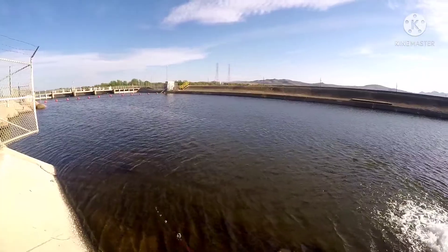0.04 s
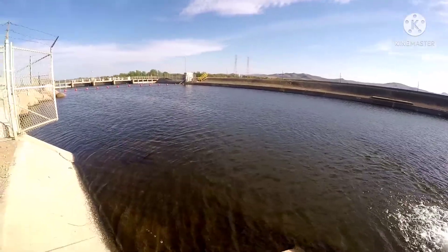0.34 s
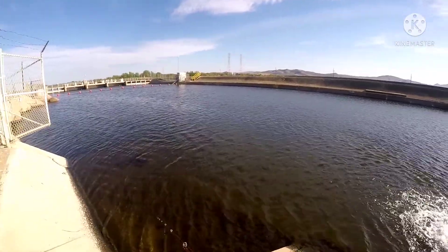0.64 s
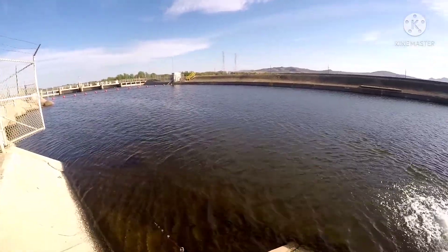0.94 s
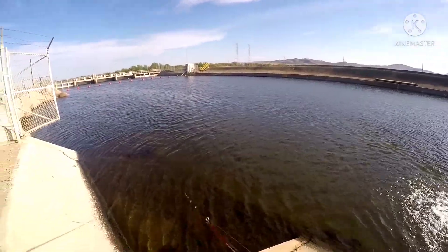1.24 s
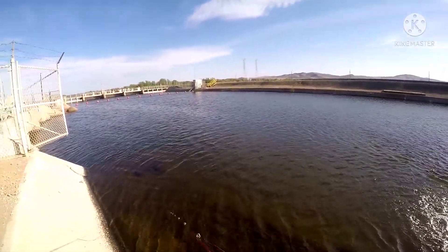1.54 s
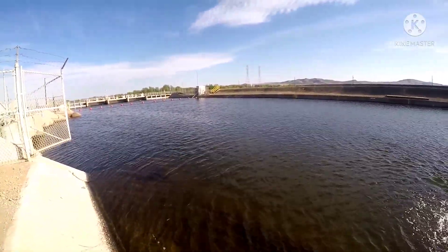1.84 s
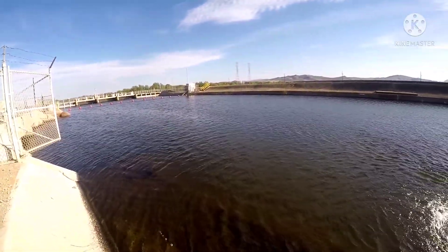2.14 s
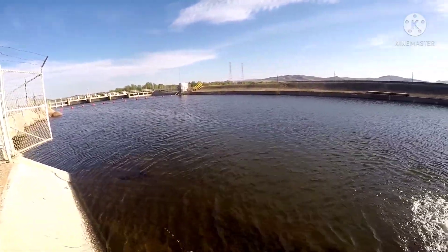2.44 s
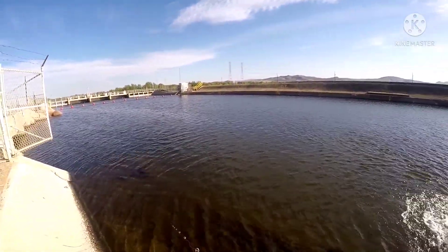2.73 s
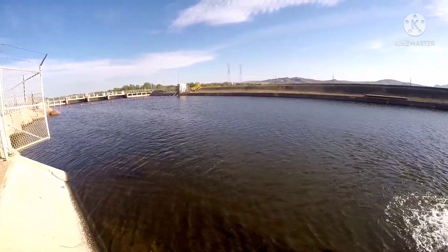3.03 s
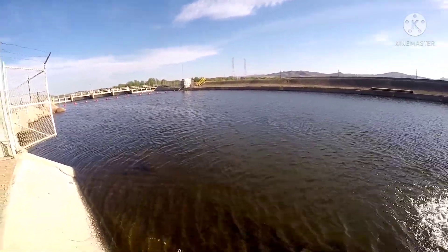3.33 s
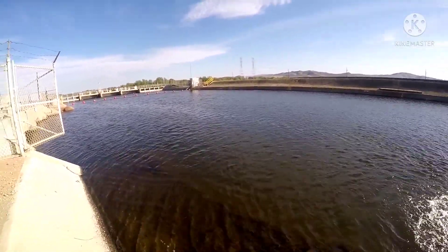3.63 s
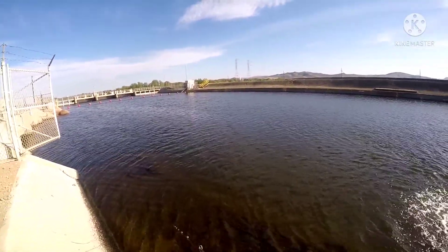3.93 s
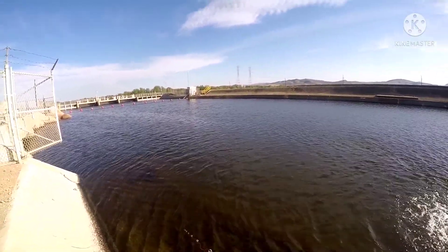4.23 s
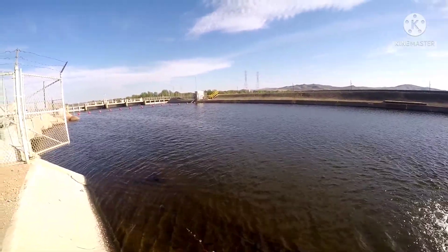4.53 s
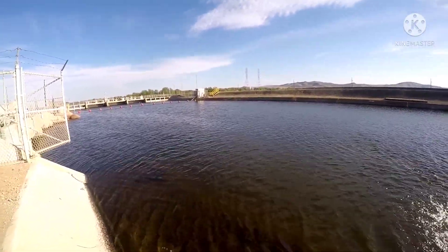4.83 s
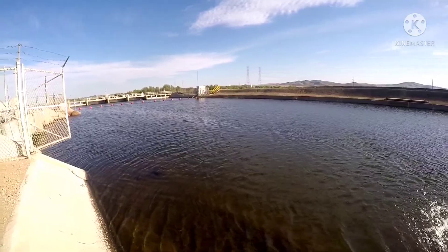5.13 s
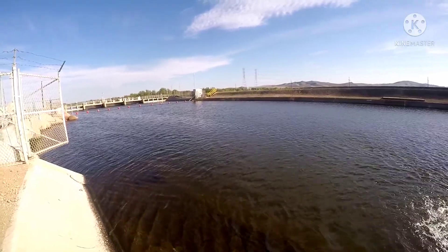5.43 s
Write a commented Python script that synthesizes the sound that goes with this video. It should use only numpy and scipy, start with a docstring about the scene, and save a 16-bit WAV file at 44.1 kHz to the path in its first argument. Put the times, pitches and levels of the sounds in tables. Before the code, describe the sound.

A jet of water splashes and gurgles steadily into a canal, while gusts of wind buffet the microphone.

```python
"""Canal side, a small camera a few metres from an outflow pipe. From the start the jet plunges in: big
bubbles gurgle where it drives air under, lumps of water slap, drops and spray patter back on top.
Gusts buffet the microphone through the first second and a half. Near 2 s the jet falters; the wind
eases, then picks up again at 3 s. The splash thins once more at 4.5 s and runs on to the end."""
import sys
import numpy as np
from scipy import signal
from scipy.fft import rfft, irfft
from scipy.io import wavfile
from scipy.ndimage import uniform_filter1d

SR = 44100
rng = np.random.default_rng(int(sys.argv[2]) if len(sys.argv) > 2 else 0)


def dump_mix(stems):
    """Bounce the given channels to the path in sys.argv[1] as a 16-bit WAV at rate SR."""
    frames = np.atleast_2d(stems).T  # one column per channel
    limited = np.clip(frames, -1, 1)  # hard clip at full scale
    pcm = np.round(limited * 32767).astype(np.int16)
    wavfile.write(sys.argv[1], SR, pcm)


N = 245637
TIME, FREQS = np.arange(N) / SR, np.fft.rfftfreq(N, 1 / SR)

# Tone of each source at the microphone. Each row: frequency in Hz, gain in dB.
SPLASH_TONE = [(500, -14), (850, -5.5), (1270, -2), (1590, -5.5), (2570, 0.5), (3360, -13.5), (3830, -6),
               (4640, -5.5), (5470, -14), (6070, -13), (6800, -18.5), (8840, -38), (15000, -120)]
GURGLE_TONE = [(150, -35), (260, -7), (411, -0.5), (521, -1), (760, -16), (990, -85), (1670, -120)]
SPRAY_TONE = [(4290, -2), (7300, -1.5), (8520, -6), (9210, -0.5), (10200, 1), (12600, -3.5), (14700, -3.5),
              (15300, -5)]
WIND_TONE = [(8.2, -22), (14, 4), (27, 0.5), (46, 1), (66, -4), (183, -22), (240, -25), (310, -60),
             (530, -120)]
# The jet falters. Each row: time in seconds, depth in dB.
JET_FALTERS = [(0.335, 1.5), (1.355, 2), (1.92, 3.5), (3.55, 0.4), (4.52, 3), (4.98, 1.5), (5.39, 2)]
# Lumps of water hit the canal. Each row: time in seconds, relative level in dB, centre in Hz.
WATER_SLAPS = [(0.053, -29, 2210), (0.37, -21, 2520), (0.438, -27, 1410), (0.9, -34, 2500),
               (1.269, -37, 2540), (1.463, -20.5, 2540), (1.719, -24, 2510), (1.829, -27, 2210),
               (2.017, -21, 2050), (2.439, -24.5, 1790), (2.582, -25.5, 2500), (2.861, -28, 2190),
               (3.218, -22, 2450), (3.407, -25, 1410), (3.491, -24.5, 1570), (4.421, -23, 2240),
               (4.819, -30, 1250), (5.289, -23, 1740), (5.43, -21, 1090)]
# How much air the jet drags under. Each row: time in seconds, relative gurgle level in dB.
AIR_INTAKE = [(0.0, -31.5), (0.2, -29.0), (0.73, -31), (1.38, -30), (1.85, -32), (3.79, -29.5), (3.96, -34),
              (4.1, -30.5), (5.02, -31), (5.25, -30), (5.57, -32.5)]
# Big air pockets break loose. Each row: start in seconds, relative level in dB, pitch in Hz.
AIR_POCKETS = [(0.214, -16, 438), (0.532, -20, 400), (0.983, -16, 373), (1.273, -17, 371),
               (1.392, -14, 442), (1.417, -19, 435), (1.475, -23, 470), (1.697, -15.5, 487),
               (1.728, -17.5, 337), (2.11, -20, 398), (2.221, -18, 404), (2.622, -16, 395),
               (2.863, -18.5, 407), (3.491, -17.5, 508), (3.741, -19, 537), (4.094, -15.5, 424),
               (4.42, -19, 454), (5.268, -15.5, 457)]
# How much fine spray flies. Each row: time in seconds, relative level in dB.
SPRAY_LEVEL = [(0.0, -47), (1.04, -45), (1.45, -51.5), (2.07, -47.0), (2.87, -45.5), (3.73, -49.5),
               (4.02, -46), (4.52, -50), (4.81, -47.5), (5.57, -49.5)]
# Wind strength at the microphone. Each row: time in seconds, relative level in dB.
WIND_LEVEL = [(0.0, -17.5), (0.38, -14.5), (0.7, -20.5), (0.96, -15.5), (1.73, -22), (1.9, -18.5),
              (2.04, -22.5), (2.36, -21.5), (2.47, -24.5), (3.03, -16), (3.26, -22), (3.4, -14),
              (4.38, -22), (4.58, -17.5), (4.9, -25.5), (5.19, -17.5), (5.33, -23.0), (5.57, -19.5)]
# Lulls between gusts. Each row: time in seconds, depth in dB.
WIND_LULLS = [(0.015, 5.5), (0.82, 4), (1.155, 11), (1.44, 6), (1.63, 1), (2.02, 4), (3.74, 5.5),
              (4.385, 7), (5.0, 3)]
# Single eddies thump the microphone. Each row: time in seconds, relative level in dB.
EDDY_HITS = [(0.084, -13), (0.379, -15), (0.519, -15), (0.965, -20), (1.108, -15), (1.345, -25),
             (1.49, -13.5), (1.84, -23), (1.934, -18), (2.13, -21), (2.32, -21), (2.879, -17.5),
             (2.974, -24), (3.422, -19.5), (3.649, -20), (3.872, -20), (4.1, -18.5), (4.149, -14),
             (5.211, -22)]
# Bands where the camera's housing rings or cancels. Each row: centre in Hz, width in Hz, gain in dB.
HOUSING_BANDS = [(1760, 200, 1.5), (1970, 120, -1.5), (2700, 160, 0), (3420, 300, -3), (4360, 250, 0),
                 (4940, 530, 1.7), (5400, 220, -1), (6000, 300, 2), (7410, 330, -5), (8600, 500, -2),
                 (15300, 400, 5)]

FALTER_S, LULL_S = 0.035, 0.029  # half-widths of the dips


def splash(surge, level_db=-36.5, surge_db=0.92, bright_hz=3400, bright_share=0.35):
    """Drops hit the canal and trap small ringing bubbles over hissing foam; more spray, more treble."""
    drops = swarm(lo_hz=637, hi_hz=8320, per_s=2600, cycles=1.76, rise=0.021, spread_db=-0.5, sizes=28)
    plinks = swarm(lo_hz=804.7, hi_hz=7553, per_s=900, cycles=13.5, rise=0.019, spread_db=2.5, sizes=90)
    water = drops + gain_of(-3.5) * plinks + gain_of(5) * froth(patchy_db=1.5)
    patter = steadied(coloured(water, SPLASH_TONE), seconds=0.12)
    spray_db = curve(SPRAY_LEVEL)
    body = signal.sosfiltfilt(lowpass(bright_hz), patter)
    treble = (patter - body) * gain_of(bright_share * (spray_db - spray_db.mean()))
    flow_db = shower_db() - dips(JET_FALTERS, FALTER_S) + surge_db * surge
    return gain_of(level_db + flow_db) * (body + treble)


def slaps(attack_s=0.00058, decay_s=0.0078, octaves=0.37, level_db=-7):
    """A lump of water lands: a short burst in the tone of the splash, strongest round one pitch."""
    out, t = np.zeros(N), np.arange(SR // 10) / SR
    freqs = np.fft.rfftfreq(len(t), 1 / SR) + 1
    hiss = coloured(rng.standard_normal(N), SPLASH_TONE)
    envelope = (1 - np.exp(-t / attack_s)) * np.exp(-t / decay_s)
    for start, db, hz in WATER_SLAPS:
        band = np.exp(-np.log2(freqs / hz) ** 2 / (2 * octaves ** 2))
        burst = irfft(rfft(hiss[int(start * SR):], len(t)) * band, len(t))
        add(out, start - 0.002, gain_of(db + level_db) * unit_rms(burst) * envelope)
    return out


def shower_db(rise_s=0.013):
    """Each slap throws up a brief shower of drops: the level swells and sinks back."""
    ages = [np.maximum(TIME - start, 0) / rise_s for start, _, _ in WATER_SLAPS]
    return 2.0 * np.max([age * np.exp(1 - age) for age in ages], axis=0)


def gurgle(level_db=-0.86, gulp_db=2.0, uneven_db=0.75):
    """The jet drags a cloud of large bubbles under; it thickens round each gulp."""
    cloud = swarm(lo_hz=189, hi_hz=954.5, per_s=700, cycles=5.95, rise=0.04, spread_db=0.5, sizes=36)
    churn = coloured(cloud + gain_of(-9.5) * rng.standard_normal(N), GURGLE_TONE)
    mouthfuls_db = gulp_db * swells(AIR_POCKETS, width_s=0.026) + uneven_db * flutter(rate_hz=12)
    intake_db = curve(AIR_INTAKE) - dips(JET_FALTERS, FALTER_S)
    return gain_of(level_db + intake_db + mouthfuls_db) * steadied(churn, seconds=0.051)


def gulps(level_db=-1.0):
    """Single large air pockets ring out of the cloud."""
    out = np.zeros(N)
    for start, db, hz in AIR_POCKETS:
        add(out, start, gain_of(db + level_db) * bubble(hz, cycles=3.7, rise=0.012))
    return out


def spray(surge, level_db=1.5, surge_db=0.8, shower_share=1.8):
    """The finest droplets fizz and tinkle, thrown up by the same surges as the splash."""
    ticks = swarm(lo_hz=5630, hi_hz=17000, per_s=7300, cycles=1.4, rise=0.02, spread_db=1, sizes=16)
    tinkles = swarm(lo_hz=5940, hi_hz=15350, per_s=900, cycles=39, rise=0.0146, spread_db=4, sizes=60)
    fizz = ticks + gain_of(-9) * tinkles + gain_of(2.5) * froth(patchy_db=1.8)
    flying_db = curve(SPRAY_LEVEL) + shower_share * shower_db() + surge_db * surge
    return gain_of(level_db + flying_db) * coloured(fizz, SPRAY_TONE)


def swarm(lo_hz, hi_hz, per_s, cycles, rise, spread_db, sizes):
    """Bubbles of many sizes born at random, with even power per Hz."""
    out = np.zeros(N)
    for hz in np.geomspace(lo_hz, hi_hz, sizes):
        births = rng.random(N) < per_s / sizes / SR
        strength = gain_of(spread_db * np.minimum(rng.exponential(1, N), 4))
        ring = bubble(hz, cycles, rise)
        out += signal.oaconvolve(births * strength, ring * np.sqrt(hz / np.sum(ring ** 2)))[:N]
    return unit_rms(out)


def bubble(hz, cycles, rise):
    """A pocket of air rings for some cycles; its pitch climbs as it nears the surface."""
    age = np.arange(int(6 * cycles / hz * SR) + 2) * hz / cycles / SR  # in decay times
    envelope = (1 - np.exp(-2 * age * cycles)) * np.exp(-age)
    return envelope * np.sin(2 * np.pi * cycles * (age + rise * age ** 2 / 2))


def froth(patchy_db):
    """The hiss of countless merged drops, in brief patches of pitch."""
    frames = dict(nperseg=512, noverlap=384)
    hiss = signal.stft(rng.standard_normal(N), **frames)[2]
    patches = uniform_filter1d(rng.standard_normal(hiss.shape), size=12, axis=0)  # across pitch
    patches = unit_rms(uniform_filter1d(patches, size=10, axis=1))  # across time
    return unit_rms(signal.istft(hiss * gain_of(patchy_db * patches), **frames)[1][:N])


def wind(push_db=-1.0, eddies_db=-13.0, eddies_follow=0.88, puff_db=2.5):
    """Turbulence pushes on the microphone in lumps; its finer eddies come in the strongest pushes."""
    air = coloured(rng.standard_normal(N), WIND_TONE)
    rumble = signal.sosfiltfilt(lowpass(hz=70), air)
    push = steadied(rumble, seconds=0.057)
    eddies = steadied((air - rumble) * (abs(signal.hilbert(push)) + 1.5), seconds=0.054)
    gust_db = curve(WIND_LEVEL) + puff_db * swells(EDDY_HITS, width_s=0.045) - dips(WIND_LULLS, LULL_S)
    lumps = flutter(rate_hz=6)
    return (gain_of(gust_db + push_db + 0.8 * lumps) * push
            + gain_of(eddies_follow * gust_db + eddies_db + 1.8 * lumps) * eddies)


def buffets(rise_s=0.007, ripple_share=0.32, ripple_hz=260, level_db=1):
    """An eddy strikes the microphone: one swing of pressure carrying a short low ripple."""
    out, age = np.zeros(N), np.arange(SR // 10) / SR / rise_s
    envelope, swing = age * np.exp(1 - age), -np.cos(np.pi * age / 2)
    for time, db in EDDY_HITS:
        ripple = unit_rms(signal.sosfilt(lowpass(ripple_hz), rng.standard_normal(len(age))))
        add(out, time - rise_s, gain_of(db + level_db) * envelope * (swing + ripple_share * ripple))
    return out


def wander(rate_hz):
    """Random drift of rms 1, strongest round rate_hz."""
    ratio = FREQS / rate_hz
    return unit_rms(irfft(rfft(rng.standard_normal(N)) * ratio / (1 + ratio ** 2), N))


def flutter(rate_hz):
    """Uneven swings of rms 1, about rate_hz a second, with no slow drift."""
    ratio = FREQS / rate_hz
    swings = irfft(rfft(rng.standard_normal(N)) * ratio ** 2 / (1 + ratio ** 4), N)
    return steadied(swings, seconds=0.2)


def swells(events, width_s):
    """A smooth hump of height 1 round each event."""
    return np.max([np.exp(-((TIME - time) / width_s) ** 2) for time, *_ in events], axis=0)


def dips(events, width_s):
    """Decibels lost in a smooth hollow round each event."""
    return sum(db * np.exp(-((TIME - time) / width_s) ** 2) for time, db in events)


def curve(rows):
    """Levels joined by straight lines in time."""
    return np.interp(TIME, *np.transpose(rows))


def coloured(x, tone):
    """Shapes a signal's spectrum, at rms 1."""
    hz, db = np.transpose(tone)
    tone_db = np.interp(np.log(FREQS + 1), np.log(hz + 1), db)
    return unit_rms(irfft(rfft(x) * gain_of(tone_db), N))


def steadied(x, seconds):
    """Holds the mean power steady over spans longer than seconds."""
    size = int(seconds * SR)
    power = uniform_filter1d(uniform_filter1d(x ** 2, size), size)
    return x / np.sqrt(power + 1e-9)


def lowpass(hz):
    """A second-order low-pass filter."""
    return signal.butter(2, hz, fs=SR, output="sos")


def gain_of(db):
    """Decibels to a factor."""
    return 10 ** (db / 20)


def unit_rms(x):
    """Scales to an rms of 1."""
    return x / np.sqrt(np.mean(x ** 2) + 1e-20)


def add(mix, start_s, sound):
    """Lays a sound into the mix."""
    part = mix[max(round(start_s * SR), 0):][:len(sound)]
    part += sound[:len(part)]


def scene():
    """The jet surges a few metres off, the wind is right on the microphone; open water gives no echo."""
    surge = wander(rate_hz=20)
    air = wind() + buffets()
    water = gurgle() + gulps() + splash(surge) + slaps() + spray(surge)
    return (water + air)[None]


def record(dry, edge_hz=15350):
    """The camera's mono microphone: coloured by its housing, cut off above edge_hz."""
    housing_db = sum(db * np.exp(-(2 * (FREQS - hz) / width) ** 2) for hz, width, db in HOUSING_BANDS)
    boxed = irfft(rfft(dry) * gain_of(housing_db), N)
    band_limit = signal.firwin(1023, edge_hz, window=("kaiser", 9), fs=SR)
    return signal.oaconvolve(boxed, band_limit[None], "same")


dry = scene()
out = record(dry)
dump_mix(out)
```